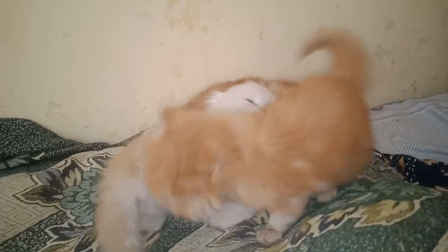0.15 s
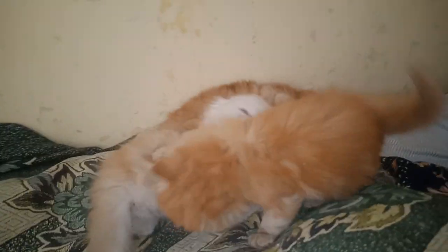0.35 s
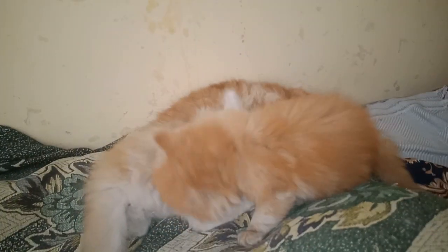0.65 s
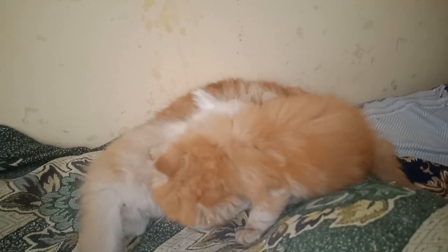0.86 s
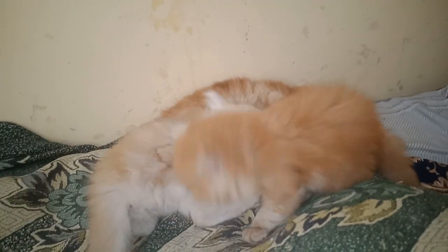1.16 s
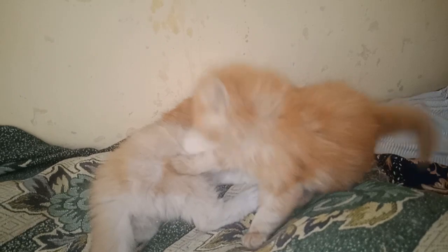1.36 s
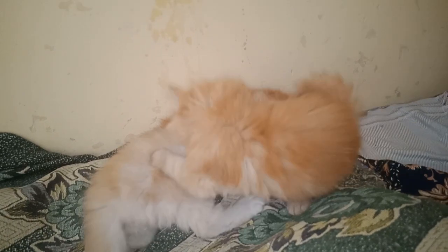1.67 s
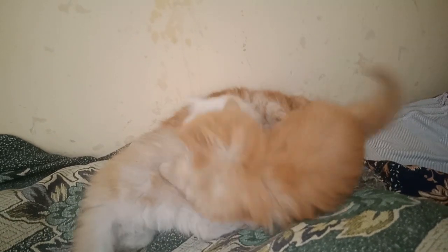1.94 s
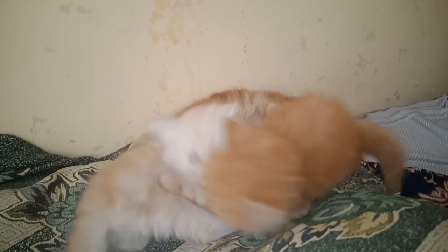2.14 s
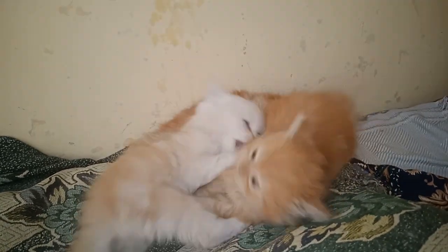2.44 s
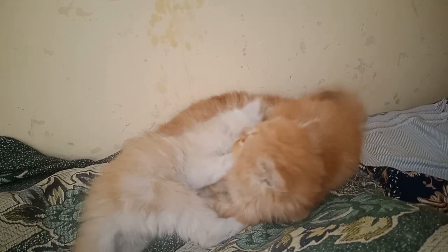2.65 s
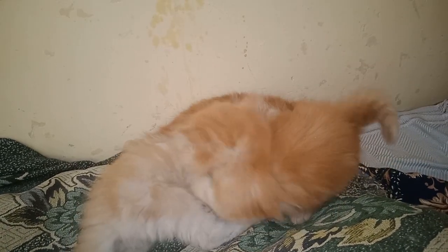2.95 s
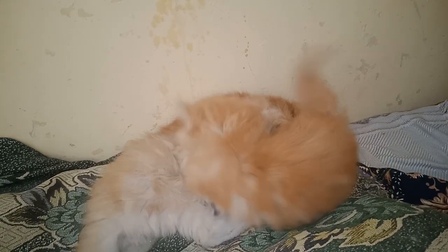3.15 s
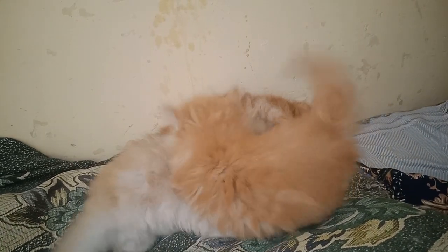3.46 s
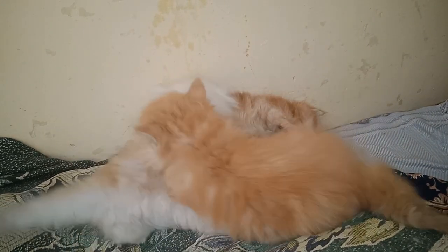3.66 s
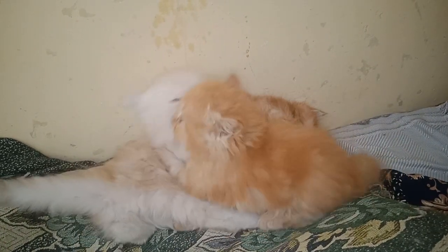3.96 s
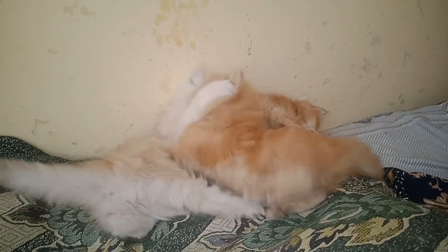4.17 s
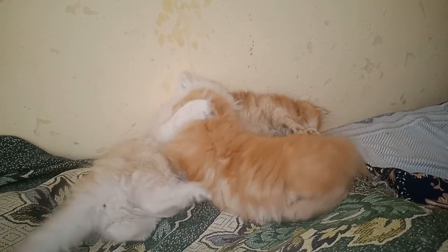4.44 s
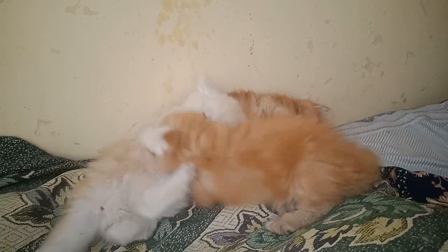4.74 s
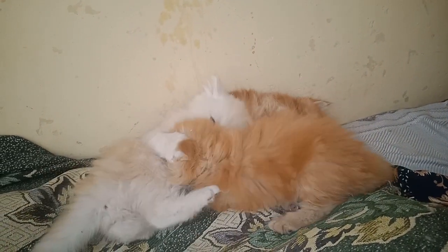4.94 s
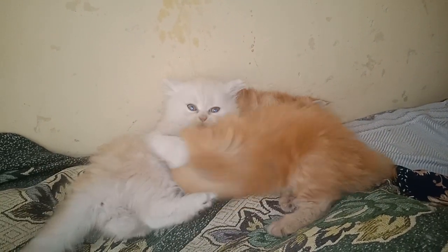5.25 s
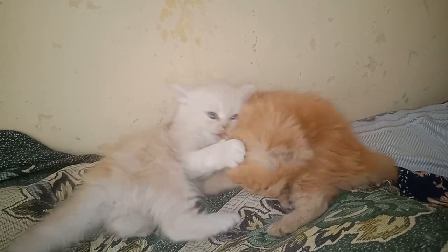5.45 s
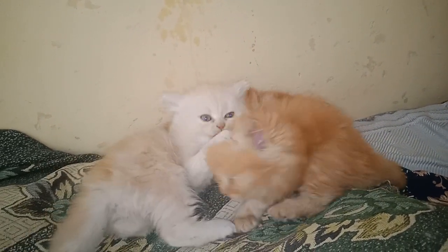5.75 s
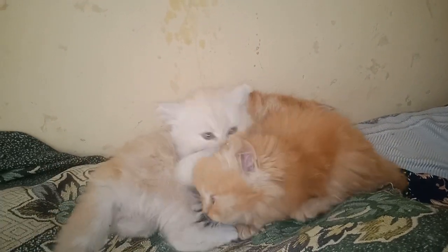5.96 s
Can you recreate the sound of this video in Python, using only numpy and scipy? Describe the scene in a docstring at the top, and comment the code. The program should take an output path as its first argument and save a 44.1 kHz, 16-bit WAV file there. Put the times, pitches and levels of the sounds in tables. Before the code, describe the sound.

Chicks peep over a faint hum of distant traffic, with a wooden knock, two microphone thuds and heavy furniture dragged twice.

```python
"""Chicks peep in a hard-walled yard, heard through an open door over the hum of far traffic.
Each peep is a gliding tone followed by its reflections. Knocks excite the resonances of something
wooden, and heavy furniture is dragged twice, its stick-slip friction juddering at about 80 Hz.
Twice, kittens on a bed bump the left microphone port of the phone beside them, and it thuds."""
import sys
import numpy as np
from scipy import signal
from scipy.fft import rfft, irfft, next_fast_len
from scipy.io import wavfile
from scipy.ndimage import uniform_filter1d, map_coordinates

SR = 44100
rng = np.random.default_rng(int(sys.argv[2]) if len(sys.argv) > 2 else 0)


def generate_wav(sig):
    """Save sig (samples, or channels by samples) to the path in sys.argv[1] as 16-bit PCM at SR."""
    pcm = np.round(np.clip(np.atleast_2d(sig).T, -1, 1) * 32767).astype(np.int16)
    wavfile.write(sys.argv[1], SR, pcm)


N = 269010

COHERENCE = [(60, 0.8), (210, 0.95), (390, 0.8), (740, 0.51), (1380, 0), (5000, 0.25)]  # diffuse field: f/Hz, left-right correlation
BALANCE = [(60, -1), (260, 0.5), (690, 2), (1120, -3.5), (1820, -1), (4830, -5)]  # airborne sound: f/Hz, left minus right level/dB
YARD_DECAY = [(2500, 1), (5000, 0.67)]  # reverberation: f/Hz, T60/s
WALL_ECHOES = [(.027, -6), (.082, -18)]  # discrete reflections: delay/s, gain/dB
TRAFFIC_LEVEL = [(0, -54.5), (.7, -54.5), (.8, -59.5), (1.1, -58), (1.3, -54.5), (3.1, -55), (6.1, -54.5)]  # the drone's envelope: t/s, level/dB
# Low, middle and high traffic bands, and converter noise: f/Hz, relative spectral level/dB
RUMBLE_SPECTRUM = [(15, -72), (25, -23.5), (102, 0.5), (157, 4.5), (199, -4), (236, -5.5), (330, -16),
                   (430, -58), (730, -120)]
DRONE_SPECTRUM = [(160, -29), (270, -3.5), (313, -12), (350, -9), (500, -10), (700, -8.5), (1050, -16),
                  (1430, -32), (2420, -120)]
HUSH_SPECTRUM = [(530, -36), (900, -43.5), (1100, -5), (1390, -3), (3510, -15), (3930, -17), (5280, -27),
                 (6860, -69.5), (11600, -120)]
HISS_SPECTRUM = [(5000, 3.5), (7000, 0), (15000, -0.5)]
HUM_TRACKS = [
    [(0.0, 243, -62.5), (0.178, 240.6, -55), (0.25, 203, -84)],
    [(1.75, 156.4, -62.5), (2.618, 167.7, -52), (2.9, 163.4, -66)],
]  # one track per faint hum: t/s, f/Hz, level/dB
# Wood on wood: t/s, level/dB, favoured f/Hz, its lift/dB, ring time/yard T60, tick level/dB
KNOCKS = [(2.894, -46, 1260, 14, 0.14, -68), (2.915, -54, 1480, 17, 0.24, -70),
          (3.3606, -25, 780, -0.5, 0.59, -35), (3.377, -29, 2020, -1.5, 0.64, -44),
          (5.627, -34.5, 508, 43, 0.61, -70)]
# Struck wood, rattling frame and scraping contact: f/Hz, relative spectral level/dB
WOOD_SPECTRUM = [(59, -44), (100, -23), (245, -20.5), (500, -14.5), (770, -5.5), (1200, -18), (2150, -18),
                 (2900, -30.5), (3850, -26.5), (5280, -38.5), (6860, -58), (11600, -120)]
FRAME_SPECTRUM = [(60, -49), (110, 3), (160, 4.5), (200, 0.5), (242, -4.5), (290, -0.5), (430, -7),
                  (760, -4.5), (920, -10.5), (1050, -49), (1430, -52), (2420, -120)]
SCRAPE_SPECTRUM = [(530, -5), (900, -9), (1020, -7.5), (1260, -5), (2120, -8), (3760, -23.5), (5280, -40),
                   (6860, -71), (11600, -120)]
# Resonances of the wood and of the furniture's frame: f/Hz, lift/dB
WOOD_MODES = [(522, 6.3), (743, 6.2), (880, 4.4)]
FRAME_MODES = [(428, 7.5), (567, 4.5), (770, 5.5), (888, 5.5), (1268, 9.5), (1517, 3), (1745, 6.5)]
BUMPS = [(1.6612, -12, -31, -12), (1.665, -6, 2.5, -19.5), (6.053, -11, -23, -10), (6.0512, -9, 11.5, -33)]  # two pulses per bump: t/s, level/dB, thud gain/dB, right port gain/dB
DRAGS = [
    [(4.275, 78.64, -50, -55), (4.35, 80.65, -45.5, -55), (4.39, 82.5, -43, -31.5),
     (4.55, 78.97, -38.5, -32), (4.58, 80.27, -33.5, -24), (4.62, 80.47, -32, -25), (4.72, 79.92, -31, -28),
     (4.78, 77.83, -33, -48), (4.82, 77.7, -32, -27.5), (4.88, 75.7, -34, -27.5), (4.915, 74.82, -35, -38),
     (4.96, 75.27, -37, -28.5), (5.01, 74.55, -46, -54), (5.12, 73.9, -54.5, -55)],
    [(5.622, 82.44, -46.5, -55), (5.7, 84.65, -45.5, -38.5), (5.76, 82.56, -47, -35.5),
     (5.83, 84.45, -38, -27), (5.93, 85.1, -32, -22.5), (6.04, 84.7, -30, -27), (6.1, 83.2, -34, -24.5)],
]  # one track per drag: t/s, slip f/Hz, rattle level/dB, floor boom level/dB
DRAG_OVERTONES = [(-7, -9.5), (1.5, -5)]  # per drag, re the rattle: 2nd harmonic/dB, 3rd harmonic/dB
# Far calls: t/s, length/s, start f/Hz, sag/(Hz/s), final drop/Hz, start level/dB, growth/dB
FAR_CALLS = [(0, 0.029, 4090, 3000, 220, -52, -14), (0.04, 0.057, 4420, 4000, 10, -68.5, -5),
             (0.496, 0.15, 4770, 4300, 10, -73, 6), (0.697, 0.1, 4880, 3600, 10, -77, -3),
             (0.82, 0.078, 4600, 1000, 10, -79, -1), (0.914, 0.062, 4430, 1400, 10, -75, -2),
             (1.135, 0.16, 4436, 1900, 500, -65.5, 3.5), (1.414, 0.059, 4190, -2700, 10, -79, 0),
             (1.677, 0.13, 4980, 5000, 600, -65.5, 6.5), (2.218, .08, 4400, 600, 10, -73, -8),
             (2.315, 0.1, 4720, 10500, 73, -67, 1.5), (2.53, 0.092, 5050, 5020, 500, -72, 5),
             (2.612, .022, 3500, 20000, 10, -63, 1), (2.772, 0.155, 4880, 5000, 10, -70, -7),
             (2.95, 0.048, 4850, 4500, 200, -73, 0), (3.043, 0.044, 4760, 8000, 78, -69, -1),
             (3.066, 0.087, 3705, 4000, 10, -71.5, 7), (3.577, 0.085, 4480, -3100, 10, -82, 4),
             (3.65, 0.067, 4720, 2000, 80, -79, 2), (3.905, 0.162, 4590, 1102, 870, -75.5, 13),
             (4.197, .045, 4560, 7998, 12, -73, -5), (4.25, .025, 3950, 8996, 10, -65, 1),
             (4.522, 0.14, 5060, 3001, 180, -72.5, 0), (5.075, 0.057, 4450, 3000, 650, -77.5, 9),
             (5.187, 0.12, 4800, 3400, 10, -73.5, -12), (5.35, 0.088, 5290, 10498, 850, -75, 17),
             (5.419, 0.138, 4870, 1700, 950, -71.5, 4.5), (5.71, 0.064, 4290, 4303, 10, -74.5, -5.5),
             (5.965, 0.15, 5380, 7500, 900, -80, 23)]
# Near calls: fall onset t/s, fall level/dB, whistle start f/Hz, bend f/Hz, end f/Hz, end level/dB,
# fall from f/Hz, fall to f/Hz, whistle length/s, last note level re the fall/dB
NEAR_CALLS = [(0.634, -47.5, 5450, 4830, 4660, -64, 3705, 3320, 0.15, -18),
              (1.136, -41, 5140, 4870, 4480, -58, 3780, 3300, .11, -21),
              (1.676, -43, 5430, 4940, 4350, -52, 3870, 3410, 0.095, -14),
              (2.185, -40, 5550, 4840, 4330, -66, 3940, 3390, 0.13, -20),
              (2.691, -42, 5450, 5260, 4550, -62, 3704, 3290, 0.084, -13),
              (3.263, -44, 5500, 5070, 4400, -57, 3970, 3440, 0.1, -13.5),
              (3.839, -53, 5560, 4800, 4000, -59, 4090, 3690, 0.21, -9),
              (4.329, -40.5, 5700, 5050, 4370, -58.5, 3590, 2850, 0.18, -13)]
FALL_SHAPE = [(0, -.05, 0), (.0125, 1, -5)]  # the loud fall: t/s from its onset, share of the fall, relative level/dB
LAST_NOTE = [(.0148, 2750, -1), (.018, 2330, -4), (.026, 2340, 0), (.032, 2290, -6)]  # closing note: t/s from the fall's onset, f/Hz, relative level/dB


def amp(db):
    """Amplitude ratio of a level in decibels."""
    return 10 ** (np.asarray(db) / 20)


def unit(x):
    """Normalisation to unit rms."""
    return x / np.sqrt(np.mean(x ** 2) + 1e-20)


def along(points, hz):
    """Interpolation on a logarithmic frequency axis."""
    f, values = np.transpose(points)
    return np.interp(np.log(hz + 1), np.log(f + 1), values)


def curves(rows):
    """Linear interpolation in time of each column after the first."""
    times, *columns = np.transpose(rows)
    return [np.interp(np.arange(N) / SR, times, column) for column in columns]


def gate(rows, fade_s):
    """Trapezoidal window: 1 while a track lasts, fading outside it."""
    t = np.arange(N) / SR
    return np.clip(np.minimum(t - rows[0][0], rows[-1][0] - t) / fade_s + 1, 0, 1)


def wobble(rate):
    """Smooth random modulation, rate knots a second."""
    return map_coordinates(rng.standard_normal(int(N * rate / SR) + 4), [np.arange(N) * rate / SR])


def filtered(x, response):
    """Linear filtering: the spectrum times a frequency response."""
    size = next_fast_len(x.shape[-1] + 8192)
    return irfft(rfft(x, size) * response(np.fft.rfftfreq(size, 1 / SR)), size)[..., :x.shape[-1]]


def add(out, x, start_s):
    """Superposition of x on out from start_s."""
    part = out[:, round(start_s * SR):][:, :x.shape[1]]
    part += x[:, :part.shape[1]]


def diffuse(pair, spectrum):
    """Diffuse-field coherence: two coloured noises, alike in the bass, nearly unrelated in the treble."""
    def response(hz):
        angle = np.arccos(np.clip(along(COHERENCE, hz), -1, 1)) / 2
        return amp(along(spectrum, hz)) * [np.cos(angle), np.sin(angle)]
    mid, side = filtered(pair, response)
    return unit(np.array([mid + side, mid - side]))


def patchy(depth_db):
    """Two noises, randomly modulated over time and frequency."""
    spectra = signal.stft(rng.standard_normal((2, N + 512)), nperseg=1024)[2]
    field = uniform_filter1d(uniform_filter1d(rng.standard_normal(spectra.shape[1:]), 5, 0), 6, 1)
    return signal.istft(spectra * amp(depth_db * unit(field)), nperseg=1024)[1][:, :N]


def echo_tail(spectrum, stretch):
    """Reverberation: each frequency decays exponentially, in stretch times the yard's T60."""
    hz, t, spectra = signal.stft(rng.standard_normal((2, SR // 2)), SR, nperseg=256)
    t60 = stretch * along(YARD_DECAY, hz)[:, None]
    tail = signal.istft(spectra * amp(-60 * t / t60), SR, nperseg=256)[1]
    tail = diffuse(np.pad(tail, ((0, 0), (64, 0))), spectrum)
    return tail / np.sqrt(tail.shape[1])


def traffic():
    """Far traffic sums incoherently: three diffuse noise bands follow one envelope."""
    drone_db, = curves(TRAFFIC_LEVEL)
    swing_db = drone_db - drone_db.mean()
    rumble_db = -56.5 + swing_db + 0.7 * np.arange(N) / SR  # builds slowly
    rumble = amp(rumble_db + 1.5 * wobble(2.05)) * diffuse(patchy(3.8), RUMBLE_SPECTRUM)
    drone = amp(drone_db + 0.72 * wobble(2.77)) * diffuse(patchy(2.28), DRONE_SPECTRUM)
    hush = amp(-62 + 0.69 * swing_db) * diffuse(patchy(1.0), HUSH_SPECTRUM)
    return rumble + drone + hush


def hum():
    """A faint gliding tone comes and goes, wavering by amplitude modulation."""
    out = np.zeros(N)
    for track in HUM_TRACKS:
        hz, db = curves(track)
        envelope = gate(track, fade_s=0.089) * amp(db + 2.2 * wobble(13))
        out += np.sqrt(2) * envelope * np.sin(2 * np.pi * np.cumsum(hz) / SR)
    return out


def wood_resonance(hz, width_hz=28.6):
    """Modal response: each damped mode lifts a narrow band."""
    damping = 1j * hz * width_hz
    lifts = [1 + (amp(db) - 1) * damping / (mode_hz ** 2 - hz ** 2 + damping)
             for mode_hz, db in WOOD_MODES]
    return np.prod(lifts, axis=0)


def knocks():
    """Impact excitation: a tick, a short crack and the yard's answer, coloured by the wood's modes."""
    out, t = np.zeros((2, N)), np.arange(SR // 50) / SR
    hz = np.geomspace(60, 12000, 40)
    tick_hz, tick_t60_s = 3500, .014
    for start, db, pitch_hz, lift_db, ring, tick_db in KNOCKS:
        emphasis_db = lift_db * np.exp(-(np.log2(hz / pitch_hz) / 0.42) ** 2)
        colour = np.transpose([hz, along(WOOD_SPECTRUM, hz) + emphasis_db])
        add(out, amp(db + 23.5) * echo_tail(colour, stretch=ring), start)  # yard
        add(out, amp(db + 7) * echo_tail(colour, stretch=0.16), start)  # crack
        tick = amp(tick_db - 60 * t / tick_t60_s) * np.sin(2 * np.pi * tick_hz * t)
        add(out, np.array([tick, tick]), start + .0012)
    return filtered(out, wood_resonance)


def bumps():
    """Damped oscillation: a touch at the left port ticks, then the membrane swings ever more slowly."""
    out, t = np.zeros((2, N)), np.arange(SR // 10) / SR
    hz = 72 + 420 * np.exp(-t / .002)
    swing = np.sin(2 * np.pi * np.cumsum(hz) / SR + 1.84)
    tick = (1 - np.exp(-t / 0.0004)) ** 2 * np.exp(-t / 0.00091)
    thud = (1 - np.exp(-t / 0.01)) * amp(-60 * (t / 0.037) ** 1.9)
    for start, db, thud_db, right_db in BUMPS:
        add(out, amp(db) * (tick + amp(thud_db) * thud) * swing * amp([[0], [right_db]]), start)
    return filtered(out, lambda hz: 1 / (1 + (hz / 2200) ** 4))  # soft fur or skin: no treble


def frame_resonance(hz, width_hz=24):
    """Modal response of the furniture's frame: a Lorentzian peak in level for each mode."""
    return amp(sum(db / (1 + (2 * (hz - mode_hz) / width_hz) ** 2) for mode_hz, db in FRAME_MODES))


def dragging():
    """Stick-slip friction: the floor radiates the low harmonics, the frame rattles, the feet scrape."""
    out = np.zeros((2, N))
    for track, overtones_db, full_scrape_db in zip(DRAGS, DRAG_OVERTONES, (-39.5, -41.5)):
        slip_hz, rattle_db, boom_db = curves(track)
        cycles = np.cumsum(slip_hz * (1 + 0.0301 * wobble(35))) / SR
        judder = np.zeros(N)
        for k, db in enumerate([boom_db, *(rattle_db + step for step in overtones_db)]):
            envelope = amp(db + (1.2 + 1.5 * k) * wobble(30))
            judder += np.sqrt(2) * envelope * np.cos(2 * np.pi * (k + 1) * cycles + 2.4 * k)
        slips = np.diff(np.floor(cycles), prepend=0) * amp(2.2 * wobble(80))
        # slips ring on in the rooms between, mixed with loose rattle
        rooms = echo_tail(FRAME_SPECTRUM, stretch=0.25)
        ringing = unit(signal.fftconvolve(slips[None], rooms, axes=1)[:, :N])
        rattle = amp(rattle_db) * unit(0.65 * ringing + 0.62 * diffuse(patchy(1.9), FRAME_SPECTRUM))
        scrape_db = full_scrape_db + 1.015 * (rattle_db + 30)  # full at a rattle of -30 dB
        scrape = amp(scrape_db) * diffuse(patchy(1.0), SCRAPE_SPECTRUM)
        frame = filtered(rattle + scrape, frame_resonance)
        out += gate(track, fade_s=0.0068) * (judder * amp([[-.8], [.8]]) + frame)
    return filtered(out, lambda hz: hz ** 3 / np.sqrt(hz ** 6 + 52 ** 6))  # floor radiates no deep bass


def peep(out, glide, wet_db, attack_s, release_s):
    """Multipath propagation: an unsteady glide (t/s, f/Hz, level/dB) arrives direct, then reflected."""
    times, hz, db = np.transpose(glide)
    start, end = times[0], times[-1]
    t = np.arange(start, end, 1 / SR)
    jitter = lambda step_s, count: np.interp(t, start + step_s * np.arange(count),
                                             rng.standard_normal(count))
    edge = np.clip(np.minimum((t - start) / attack_s, (t[-1] - t) / release_s), 0, 1)
    envelope = edge * amp(np.interp(t, times, db) + 2.4 * jitter(0.00813, 64))
    cycles = np.cumsum(np.interp(t, times, hz) * (1 + .005 * jitter(0.00813, 64))) / SR
    rasp = 1 + .38 * jitter(.002, 128)
    tone = np.sqrt(2) * envelope * rasp * np.sin(2 * np.pi * cycles)[None]
    # the right port faces the door and hears the direct sound first
    add(out[:1], tone, start + .0004)
    add(out[1:], tone, start)
    for delay, wall_db in WALL_ECHOES:
        add(out, amp(wall_db + 2 * rng.standard_normal((2, 1))) * [[1], [-.2]] * tone, start + delay)
    # the yard's wash, then its early reflections
    for tail_db, stretch, delay in (wet_db, 0.37, 0.0048), (wet_db - 3, 0.078, 0.0017):
        tail = echo_tail([(100, 0)], stretch)
        add(out, amp(tail_db) * signal.fftconvolve(tone, tail, axes=1), start + delay)


def far_chicks():
    """Frequency modulation: each faint whistle glides linearly and ends in an exponential drop."""
    out, share = np.zeros((2, N)), np.linspace(0, 1, 24)
    for start, length, first_hz, sag_hz_per_s, drop_hz, db, growth_db in FAR_CALLS:
        t = length * share
        hz = first_hz - sag_hz_per_s * t - drop_hz * np.exp((t - length) / 0.018)
        glide = np.transpose([start + t, hz, db + growth_db * share])
        peep(out, glide, wet_db=-3, attack_s=.25 * length, release_s=.004)
    return out


def near_chick():
    """A register break: the whistle bends down, then jumps to a loud steep fall and a last low note."""
    out = np.zeros((2, N))
    for onset, db, first_hz, bend_hz, end_hz, end_db, from_hz, to_hz, length, last_db in NEAR_CALLS:
        whistle = [(onset - length, first_hz, -82.5), (onset - .016, bend_hz, -71.5),
                   (onset + .006, end_hz, end_db)]
        peep(out, whistle, wet_db=-5, attack_s=0.012, release_s=0.0021)
        fall = [(onset + t, from_hz + share * (to_hz - from_hz), db + step_db)
                for t, share, step_db in FALL_SHAPE]
        last_note = [(onset + t, hz, db + last_db + step_db) for t, hz, step_db in LAST_NOTE]
        peep(out, fall + last_note, wet_db=-5, attack_s=0.0014, release_s=0.004)
    return out


def scene():
    """Superposition: airborne sound, with a level difference between the ports, plus contact bumps."""
    air = near_chick() + far_chicks() + dragging() + knocks() + traffic() + hum()
    return filtered(air, lambda hz: amp(along(BALANCE, hz) / 2 * np.array([[1], [-1]]))) + bumps()


def record(dry):
    """Band-limited transduction: bass and treble roll off; converter noise grows with the mid-range."""
    mic = filtered(dry, lambda hz: 1 / (1 + (hz / 5500) ** 12) * (1j * hz / (38 + 1j * hz)) ** 2)
    mids = filtered(mic, lambda hz: (hz > 300) & (hz < 2000))
    mid_rms = np.sqrt(np.abs(uniform_filter1d(mids ** 2, 900, axis=1)))
    hiss = unit(filtered(rng.standard_normal((2, N)), lambda hz: amp(along(HISS_SPECTRUM, hz))))
    hiss_gain = amp([[1.3], [-1.3]]) * np.hypot(amp(-73.0), amp(-37.5) * mid_rms)
    return filtered(mic + hiss_gain * hiss, lambda hz: hz < 15480)


dry = scene()
out = record(dry)
generate_wav(out)
```